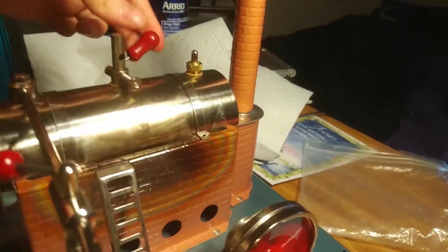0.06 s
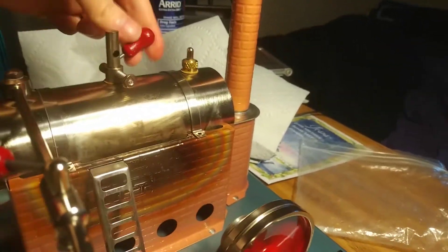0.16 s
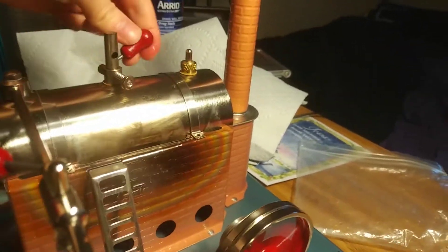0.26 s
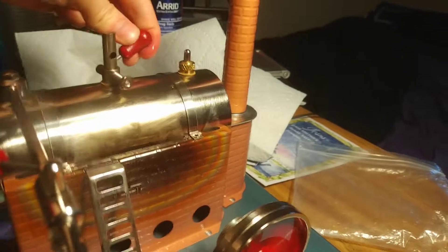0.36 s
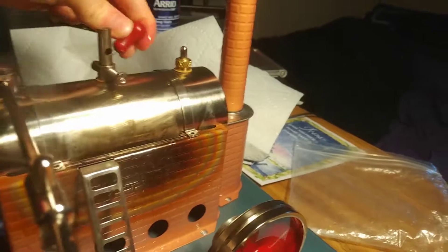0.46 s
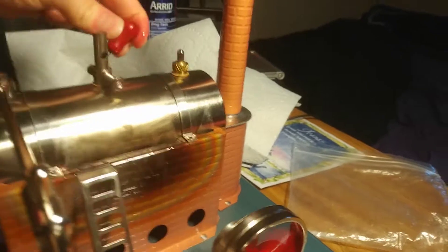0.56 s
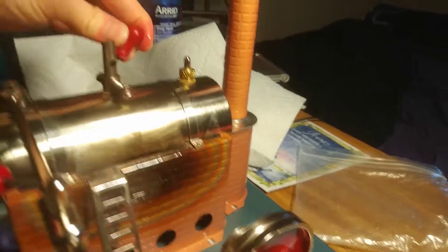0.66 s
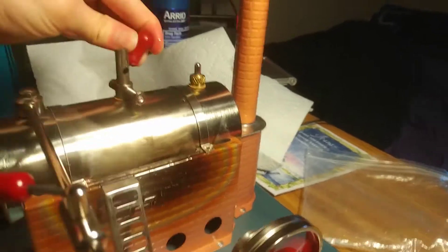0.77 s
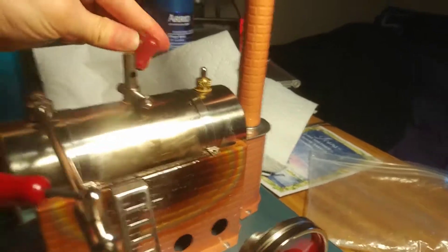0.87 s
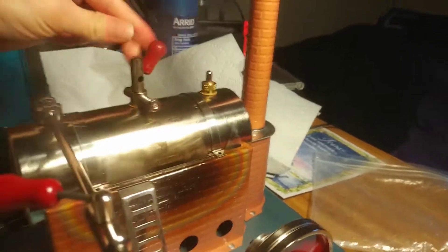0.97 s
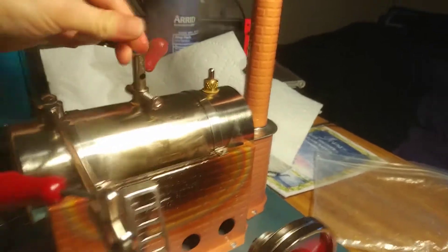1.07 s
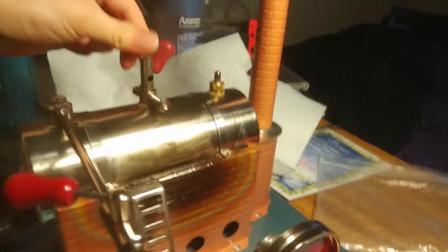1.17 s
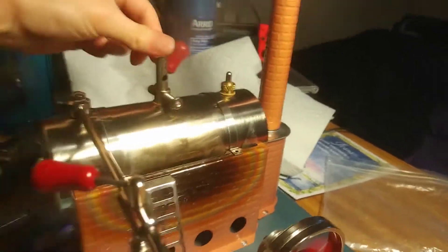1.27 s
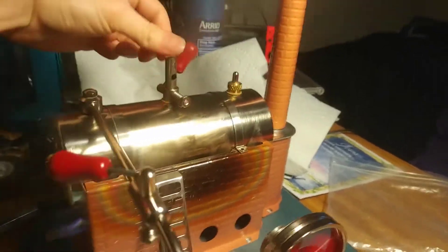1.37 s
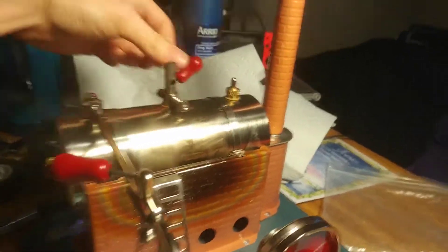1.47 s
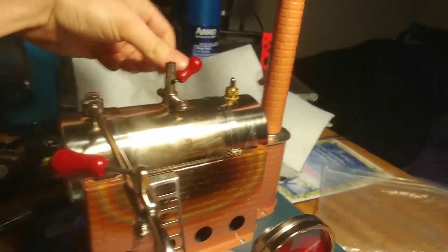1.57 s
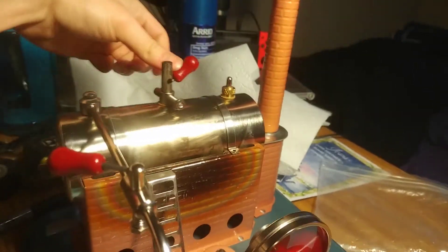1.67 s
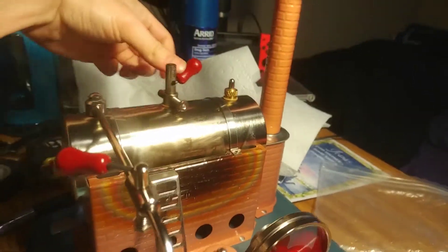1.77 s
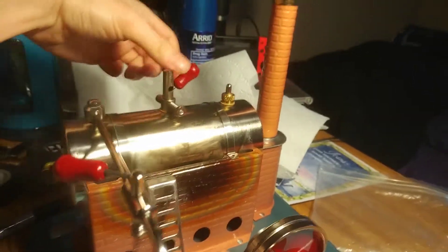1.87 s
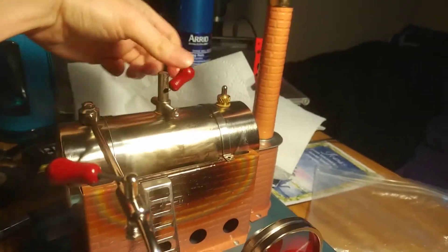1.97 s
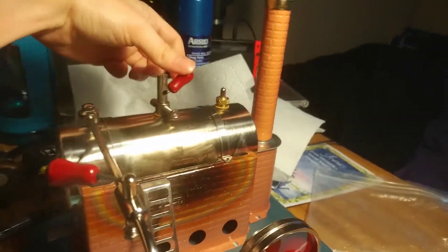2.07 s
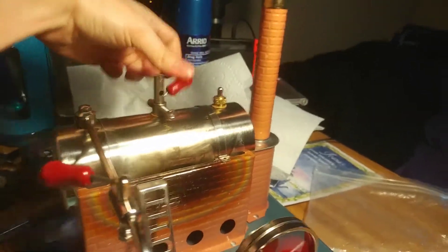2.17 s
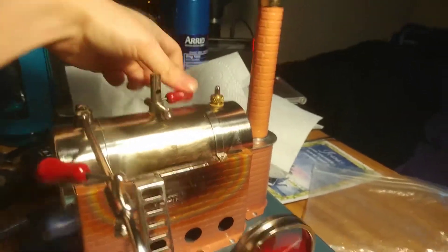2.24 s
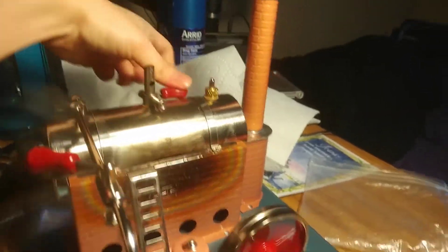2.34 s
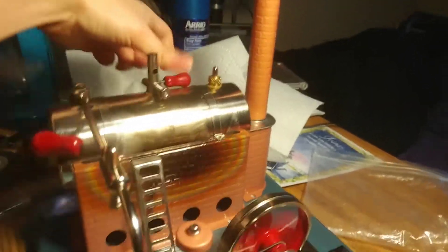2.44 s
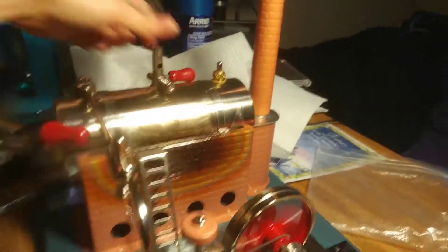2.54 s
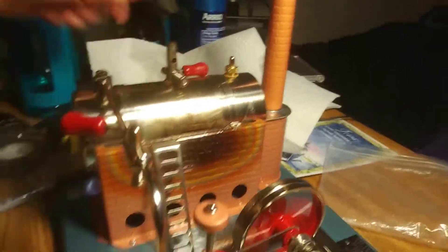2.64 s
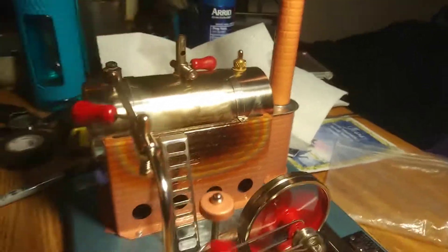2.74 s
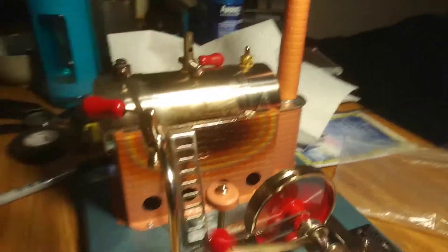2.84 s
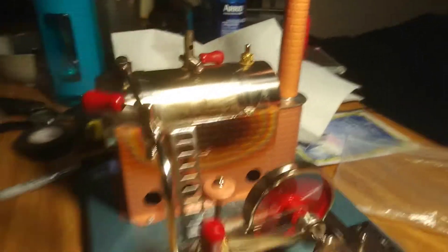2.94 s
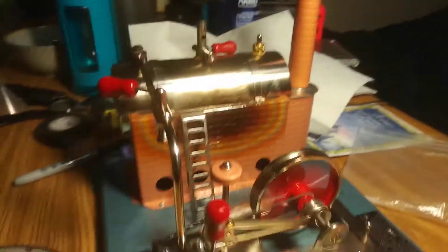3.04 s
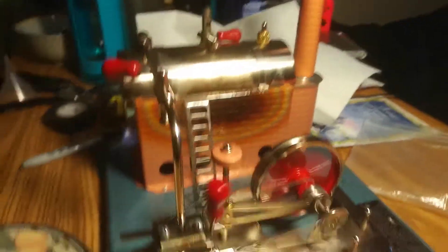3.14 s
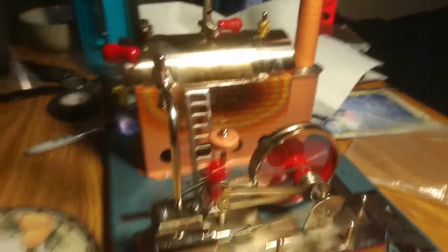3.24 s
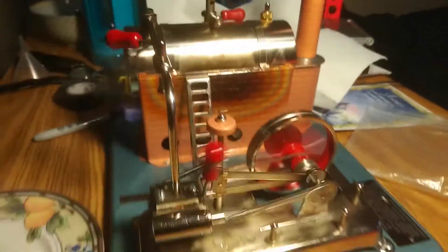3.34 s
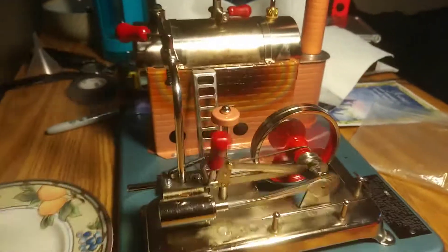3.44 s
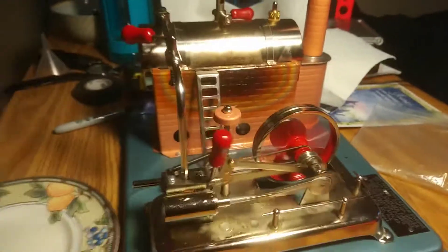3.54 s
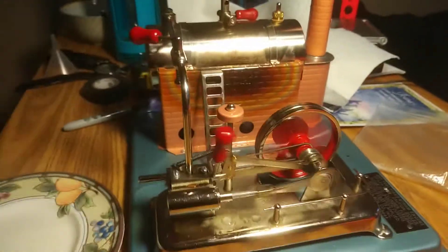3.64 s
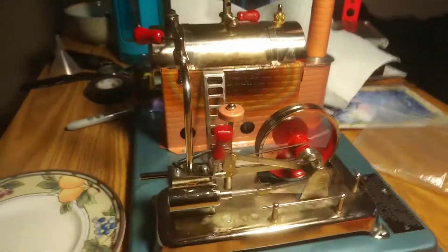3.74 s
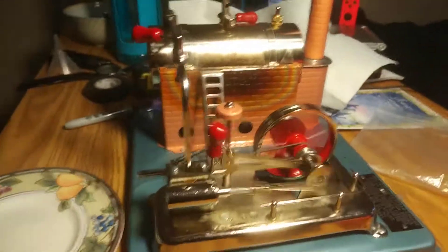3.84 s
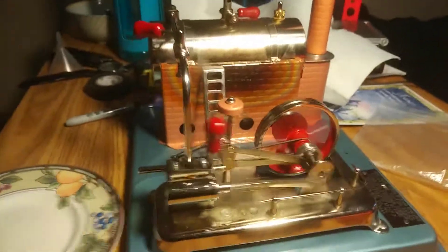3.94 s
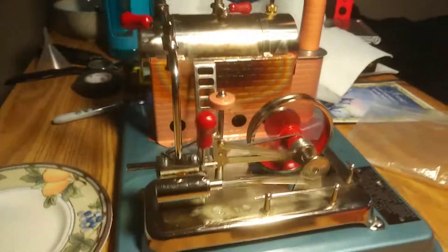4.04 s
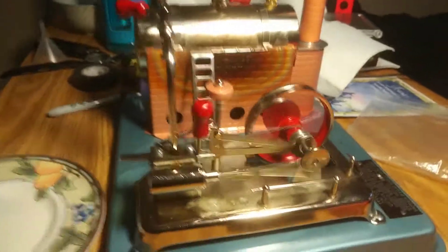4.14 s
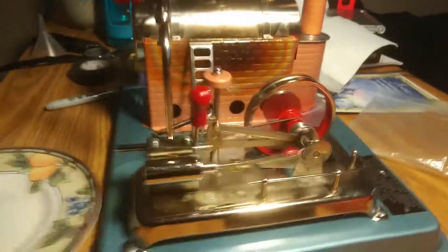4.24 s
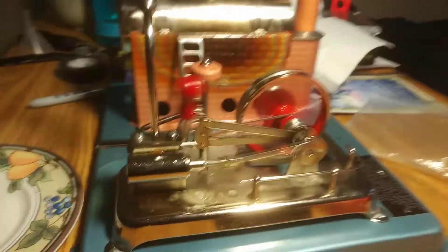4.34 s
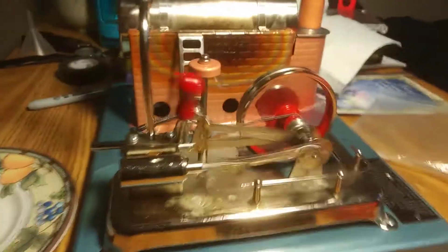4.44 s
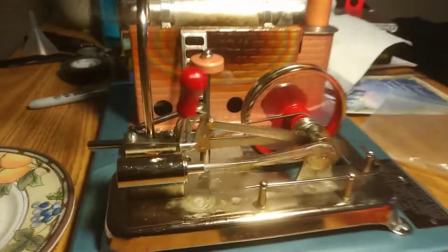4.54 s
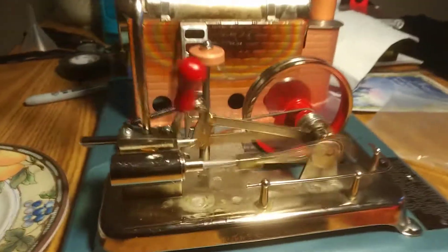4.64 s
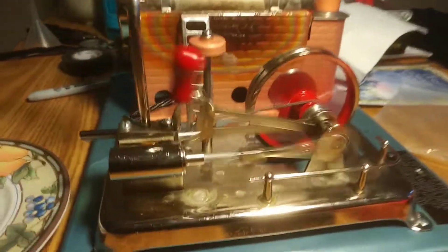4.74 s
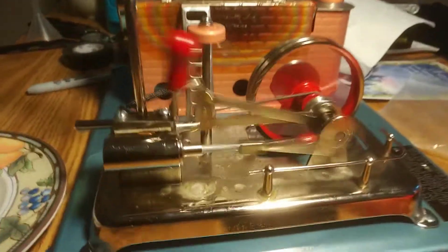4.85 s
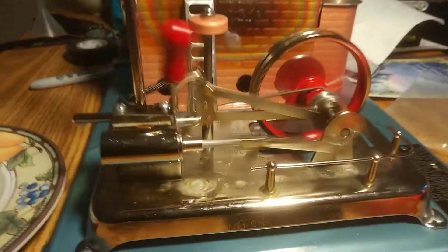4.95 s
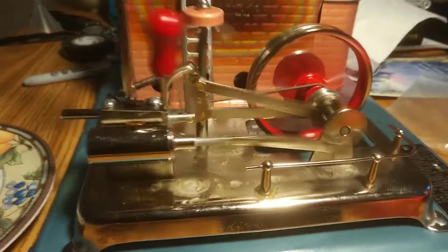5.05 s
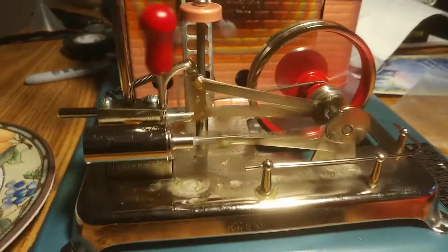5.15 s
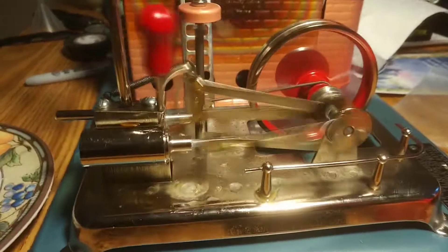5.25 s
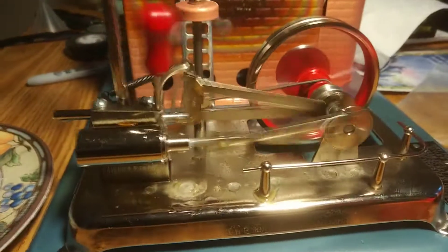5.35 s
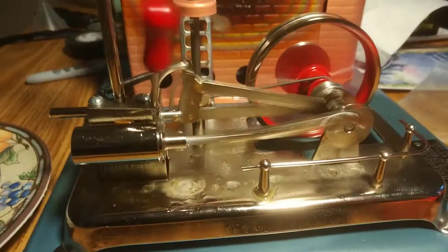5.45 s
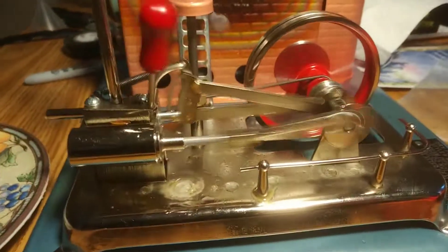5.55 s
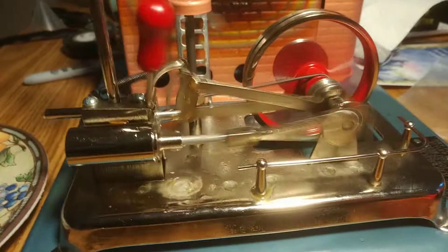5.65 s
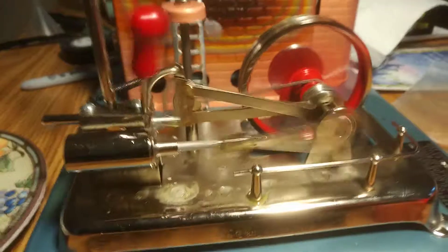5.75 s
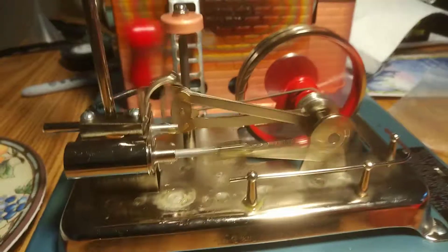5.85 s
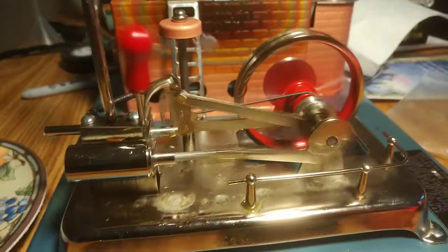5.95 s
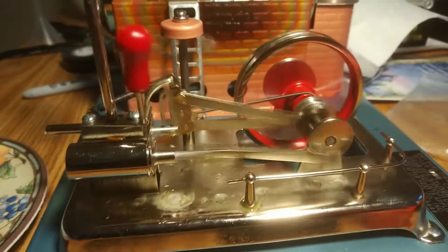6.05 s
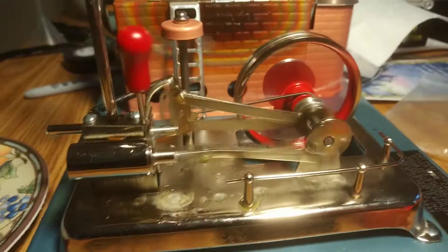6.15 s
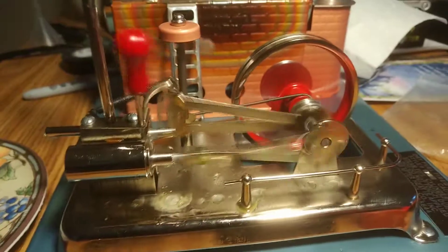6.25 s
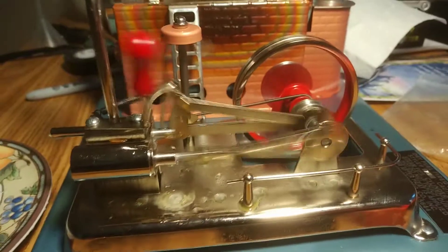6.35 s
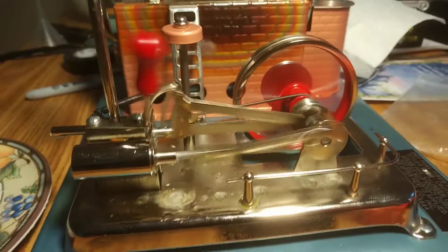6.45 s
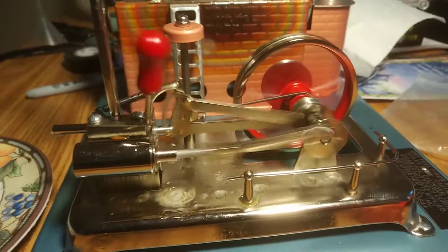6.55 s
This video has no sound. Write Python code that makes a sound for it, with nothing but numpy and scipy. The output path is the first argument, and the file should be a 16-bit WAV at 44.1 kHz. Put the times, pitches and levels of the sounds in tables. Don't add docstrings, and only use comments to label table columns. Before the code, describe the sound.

Rapid tinny clatter from a small steam engine, each turn a double knock with a breathy exhaust puff. A hiss swells and a piercing high whistle bursts out, fluttering and spitting with water drops, overloading the close microphone and pushing the engine down. It snaps off in under a second with a short room ring. A dull tap or two follows, and the engine chugs steadily over low table hum until it stops abruptly.

```python
import sys
import numpy as np
from scipy import signal
from scipy.fft import rfft, irfft, next_fast_len
from scipy.io import wavfile
from scipy.ndimage import uniform_filter1d

SR = 44100
rng = np.random.default_rng(int(sys.argv[2]) if len(sys.argv) > 2 else 0)


def amplitude_ratio(level_db):
    exponent = np.asarray(level_db, float) / 20
    return 10 ** exponent


def store_pcm(level_fs):
    pcm = np.round(np.clip(level_fs, -1, 1) * 32767).astype(np.int16)
    wavfile.write(sys.argv[1], SR, np.atleast_2d(pcm).T)


N = 291501
T = np.arange(N) / SR


def rms_one(x):
    return x / np.sqrt(np.mean(x ** 2) + 1e-20)


def in_time(rows):
    s, *columns = np.transpose(rows)
    return [np.interp(T, s, c) for c in columns]


def at_hz(points, hz):
    point_hz, db = np.array(points).T
    return np.interp(np.log(hz), np.log(point_hz), db)


def bumps(rows):
    return sum(height * np.exp(-((T - s) / length) ** 2) for s, height, length in rows)


def drift(rate_hz):
    r = np.exp(-2 * np.pi * rate_hz / SR)
    wander = signal.lfilter([1], [1, -2 * r, r * r], rng.standard_normal(N + 9000))
    return rms_one(wander[9000:])


def resonance(x, hz, width):
    r = np.exp(-np.pi * width / SR)
    zeros = np.array([1, 0, -1]) * (1 - r * r) / 2
    return signal.lfilter(zeros, [1, -2 * r * np.cos(2 * np.pi * hz / SR), r * r], x)


def clicks(times, db):
    out = np.zeros(N + SR) + 1e-18
    np.add.at(out, np.round(np.asarray(times) * SR).astype(int), amplitude_ratio(db))
    return out[:N]


def swell(x, rise_s, t60):
    up, down = np.exp(-1 / (rise_s * SR)), amplitude_ratio(-60 / (t60 * SR))
    fall = signal.lfilter([1], [1, -down], x)
    return signal.lfilter([1 - up], [1, -up], fall)


# t/s, turns done
CRANK = [(.030, 0), (.743, 8), (1.279, 14), (2.186, 24), (2.728, 30), (3.269, 36), (3.999, 44), (4.642, 51),
         (5.097, 56), (5.458, 60), (5.825, 64), (6.562, 72)]
# t/s, knock level/dB, bounce below knock/dB, puff level/dB
LOAD = [(0, -29.5, -9, -36), (.5, -28, -4, -33), (.6, -32.5, -4, -64), (.8, -26, -11.5, -19),
        (1.2, -26, 3, -18.5), (1.3, -32, -12, -34), (1.7, -36, -18, -36.5), (2.0, -31, -21, -36),
        (2.3, -33, -8, -38.5), (2.6, -28, -30, -35), (3.2, -28, -18, -39.5), (3.5, -29.5, -4, -39.5),
        (4.7, -29.5, -4, -39.5), (5.251, -25.5, -2.5, -38), (6.6, -28.5, -11, -38)]
RETURN_KNOCK_DB, RETURN_PUFF_DB = -5.0, -6.0
KNOCK_SPREAD_DB, BOUNCE_SPREAD_DB, RETURN_SPREAD_DB, PUFF_SPREAD_DB = 1.0, 2.5, 1.5, 1.2


def turns():
    at, done = np.transpose(CRANK)
    s = np.interp(np.arange(done[-1] + 1), done, at)
    when, *load = np.transpose(LOAD)
    knock, slack, puff = [np.interp(s, when, c) for c in load]
    luck = rng.standard_normal((5, len(s)))
    return np.array([
        s,
        knock + KNOCK_SPREAD_DB * luck[0],
        knock + slack + BOUNCE_SPREAD_DB * luck[1],
        knock + RETURN_KNOCK_DB + RETURN_SPREAD_DB * luck[2],
        puff + PUFF_SPREAD_DB * luck[3],
        puff + RETURN_PUFF_DB + 2 * PUFF_SPREAD_DB * luck[4]])


# t after the knock/s, level/dB
VALVE_GEAR = [
    (.029, -48),
    (.048, -39),
    (.080, -42),
]
# f/Hz, swell/s, level/dB
BASE = [(626.6, 0.0024, -2.5), (975, 0.00079, -10), (254, 0.0026, -12.5), (2300, 0.001, -30.5),
        (762.4, 0.0012, -7), (5840, 0.00062, -36)]
BOUNCE_S, RETURN_S, RETURN_BOUNCE_S = .0135, .059, .070
HAND_OFF_S, HAND_STIFFENS = 1.6, 1.057


def knocks(turn):
    s, knock, bounce, back = turn[:4]
    luck = rng.standard_normal((len(s), 8))
    hits = clicks(s, knock)
    hits -= clicks(s + BOUNCE_S + 0.00115 * luck[:, 0], bounce)
    hits += clicks(s + RETURN_S + 0.000954 * luck[:, 1], back - 1.5 + 2.6 * luck[:, 2])
    hits -= clicks(s + RETURN_BOUNCE_S + 0.001246 * luck[:, 3], back - 1 + 1.5 * luck[:, 4])
    for k, (later, db) in enumerate(VALVE_GEAR):
        hits += clicks(s + later, db + 1.0 * luck[:, 5 + k])
    t = T[:2000]
    out = 0
    for part, lift in [(T < HAND_OFF_S, HAND_STIFFENS), (T >= HAND_OFF_S, 1)]:
        ring = 0
        for hz, rise, db in BASE:
            cushioned = (t / rise) ** 2 * np.exp(1 - t / rise)
            ring = ring + amplitude_ratio(db) * cushioned * np.sin(2 * np.pi * hz * lift * t)
        out = out + signal.fftconvolve(hits * part, ring)
    return out[round(.006 * SR):][:N]


# t after the knock/s, level against knock/dB, f/Hz
TICKS = [
    (-.005, -33, 5500),
    (.043, -33, 5500),
    (.023, -28, 1600),
    (.059, -26, 1600),
    (.025, -23, 1020),
    (.060, -19, 1020),
    (.021, -28, 2500),
]


def ticks(turn):
    out = 0
    for later, db, hz in TICKS:
        hits = clicks(turn[0] + later, turn[1] + db + 0.94 * rng.standard_normal(turn.shape[1]))
        out = out + resonance(resonance(hits, hz, 440), hz, 440) * SR / 420
    return out * amplitude_ratio([[-3], [3]])


# f/Hz, likeness (0 to 1)
LIKENESS = [(60, 0.95), (130, 0.93), (290, 0.86), (640, 0.87), (1410, 0.13), (3100, 0.06), (6820, 0.57),
            (15000, 0.74)]
# f/Hz, left minus right level/dB
BALANCE_DB = [(60, 7), (110, -1), (200, 2), (380, 2), (700, 6.5), (1290, -3.5), (2380, -7), (4400, -11.5),
              (8120, -5.5), (15000, 4.5)]
# f/Hz, left leads/rad
PORT_PHASE = [(0, 0), (340, -0.4), (780, 0.1), (1030, -0.6), (1550, -4.3), (1980, -3.6), (2240, -2.0),
              (2930, 1.0), (3960, -0.7), (4390, 1.9), (5430, 4.8), (6290, 6.4), (6890, 6.3), (16200, 6.3)]


def stereo_noise(spectrum):
    size = next_fast_len(N)
    hz = np.maximum(np.fft.rfftfreq(size, 1 / SR), 1)
    mid, side = rfft(rng.standard_normal((2, size)))
    alike = np.clip(at_hz(LIKENESS, hz), 0, 1)
    pair = np.sqrt(1 + alike) * mid + np.sqrt(1 - alike) * side * [[1], [-1]]
    pair[0] *= np.exp(1j * np.interp(hz, *np.transpose(PORT_PHASE)))
    colour_db = at_hz(spectrum, hz) + at_hz(BALANCE_DB, hz) * [[.5], [-.5]]
    return rms_one(irfft(pair * amplitude_ratio(colour_db), size)[:, :N])


# f/Hz, level per Hz/dB
PUFF_COLOUR = [(2350, -42), (4000, -17), (4930, -10), (5540, -17.5), (6040, -20), (7270, -6), (9890, -2),
               (12900, 3.5), (16000, -8)]
# t/s, level/dB, t60/s
SPURTS = [
    (.0, -35, 0.049),
    (.028, -30, 0.033),
    (0.037, -20, 0.14),
    (0.109, -24.5, 0.069),
    (.172, -28, 0.034),
    (0.401, -33, 0.023),
]
PUFF_S, RETURN_PUFF_S = .0115, 0.054


def exhaust(turn):
    s, puff, back = turn[[0, 4, 5]]
    puffs = clicks(s + PUFF_S, puff + 4) + clicks(s + RETURN_PUFF_S, back + 6.5)
    burst = swell(puffs, .0028, .032)
    trail = swell(clicks(s + PUFF_S, puff - 4), .003, .32)
    spurts = sum(swell(clicks([at], db), 0.00143, t60) for at, db, t60 in SPURTS)
    return (burst + trail + spurts) * amplitude_ratio(1.36 * drift(150)) * stereo_noise(PUFF_COLOUR)


# t/s, f/Hz, level/dB
BLAST = [
    (.63, 4520, -34),
    (.652, 4650, -30),
    (.664, 5050, -9),
    (.685, 5090, -4),
    (.706, 5350, -3),
    (.765, 5170, 1.5),
    (.815, 5720, 2.5),
    (.885, 5760, 3),
    (.945, 5560, 2.5),
]
# t/s, left minus right level/dB
SHADE = [
    (.645, 1),
    (.665, -25),
    (.705, -6.5),
    (.88, -6),
    (.905, -3.9),
    (1.25, 0),
    (1.31, -11.5),
    (1.37, -14),
    (1.41, -6.5),
]
# t/s, depth/dB, length/s
SLIPS = [
    (.8, 7.5, 0.017),
    (1.0, -0.5, 0.014),
    (1.105, 0.5, 0.027),
    (1.255, 3.5, 0.037),
]
SWELL_DB_PER_S = -5
RECOVER_HZ, RECOVER_S, SAG_HZ, SAG_S = 210, .055, 310, .18
CLOSE_S, CLOSING_S, CLOSING_POWER = 1.448, .038, 3.3
CLOSING_DROP_HZ, CLOSING_DROP_DB = 1400, 27


def lever():
    hz, db = in_time(BLAST)
    held = np.maximum(T - BLAST[-1][0], 0)
    shut = np.clip((T - CLOSE_S) / CLOSING_S, 0, 1) ** CLOSING_POWER
    db = db + SWELL_DB_PER_S * held - bumps(SLIPS) - CLOSING_DROP_DB * shut
    hz = hz + RECOVER_HZ * (1 - np.exp(-held / RECOVER_S))
    hz = hz - SAG_HZ * (1 - np.exp(-held / SAG_S)) - CLOSING_DROP_HZ * shut
    return hz, db + in_time(SHADE)[0], db


# t/s, depth/dB, length/ms
DROPS = [(0.667, 5, 2.4), (0.688, 8, 2.3), (0.799, 8, 2.3), (0.911, 8, 3.0), (0.93, 12, 1.4),
         (0.938, 13, 2.2), (0.972, 11, 11.9), (0.981, 9, 2.4), (0.989, 8, 3.3), (1.015, 5, 3.7),
         (1.089, 7, 4.9), (1.108, 11, 3.8), (1.122, 15, 3.9), (1.14, 11, 2.9), (1.212, 10, 4.8),
         (1.22, 5, 2.8), (1.289, 4, 2.0), (1.303, 4, 1.6)]
# t/s, left leads/rad
LEAD = [
    (.8, 1.3),
    (.82, .6),
    (.905, .6),
    (.945, 2.6),
    (1, 0),
    (1.2, -.4),
    (1.255, -1.3),
    (1.295, -4.8),
    (1.41, -6.8),
]
# t/s, flow as hiss level/dB, wetness as pipe noise level/dB
JET = [
    (.53, -50.5, -73),
    (.56, -34, -80),
    (.63, -28, -29.5),
    (.7, -20, -25.5),
    (.85, -22.5, -44),
    (.98, -18, -18.5),
    (1.47, -23.5, -30),
    (1.5, -39, -21.5),
    (1.56, -52, -76),
]
# f/Hz, level per Hz/dB
JET_COLOUR = [(1500, -15.5), (3000, -7), (4400, -9.5), (6500, 5), (8000, -0.5), (11000, 0), (14000, 4),
              (16000, -2)]
# t/s, f/Hz, level/dB
BREATHY_START = [
    (.54, 5650, -38),
    (.585, 5900, -31),
    (.61, 5980, -24),
    (.625, 6300, -45),
]
LEAK_DB, LEAK_GROWS_DB_PER_S, LEAK_SEALED_S = -54, 5, 2.16


def whistle():
    hz, left_db, right_db = lever()
    choke = sum(1.25 * db * np.exp(-((T - s) / (ms * .0006)) ** 2) for s, db, ms in DROPS)
    sounding = (T > BLAST[0][0]) & (T < CLOSE_S + CLOSING_S)
    shaken_hz = hz + 13.3 * drift(54.5) + 4.86 * choke * drift(398)
    phase = 2 * np.pi * np.cumsum(shaken_hz) / SR
    flutter = 0.36 * drift(420)
    right = amplitude_ratio(right_db - choke + flutter) * np.sin(phase)
    left_level = amplitude_ratio(left_db - 0.174 * choke + flutter + 1.1 * drift(60))
    left = left_level * np.sin(phase + in_time(LEAD)[0])
    octave = amplitude_ratio(right_db - 35 + 2.5 * drift(20)) * np.sin(2 * phase)
    tone = np.sqrt(2) * sounding * np.array([left + octave, right + octave])

    hiss_db, pipe_db = in_time(JET)
    jet = stereo_noise(JET_COLOUR)
    jet = jet + amplitude_ratio(14.5) * resonance(jet, 9010, 10.7) * (T > 1) * (T < 1.32)
    hiss = amplitude_ratio(hiss_db + .3 * choke + 1.5 * drift(40)) * jet

    pipe_phase = 2 * np.pi * np.cumsum(np.where(T < CLOSE_S, hz, 5600)) / SR
    leak_db = LEAK_DB - LEAK_GROWS_DB_PER_S * (LEAK_SEALED_S - T)
    leak = amplitude_ratio(leak_db - 250 * np.maximum(T - LEAK_SEALED_S, 0)) * (T > CLOSE_S)
    turbulence = drift(492) * np.sin(pipe_phase) + drift(524) * np.cos(pipe_phase)
    skirt = (amplitude_ratio(pipe_db + 0.18 * choke) * (T < JET[-1][0]) + leak) * turbulence

    start_hz, start_db = in_time(BREATHY_START)
    start = amplitude_ratio(start_db) * drift(260) * np.sin(2 * np.pi * np.cumsum(start_hz) / SR)
    start *= (T > BREATHY_START[0][0]) & (T < BREATHY_START[-1][0])
    echo = room(tone[1]) * amplitude_ratio([[-21], [-12]])
    return tone + hiss + (skirt + start) * amplitude_ratio([[-6], [4]]) + echo


# t/s, level/dB, f/Hz
TAPS = [(0.028, -32, 1690), (2.047, -23.5, 1000), (2.049, -42, 2640), (2.271, -37, 2300),
        (2.298, -34.5, 2600), (2.305, -41, 3100), (2.318, -41, 3130), (2.426, -42, 2230),
        (2.566, -38, 2330), (3.509, -33.5, 1430), (3.563, -41.5, 1490), (5.883, -39, 1440),
        (6.031, -39, 1870)]


def taps():
    out = 0
    for s, db, hz in TAPS:
        body = resonance(clicks([s, s + 0.00258], [db + 29, db + 32.5]), hz, 0.25 * hz)
        body = resonance(body, hz, .5 * hz)
        thud = resonance(resonance(clicks([s], db + 39), 610, 360), 610, 360)
        out = out + body + thud
    return out * amplitude_ratio([[-4], [3]])


def drone(hz, width):
    return rms_one(resonance(resonance(rng.standard_normal(N), hz, width), hz, width))


# f/Hz, level per Hz/dB
FLOOR = [(18, -38), (30, -14.5), (134, -2.5), (311, -10), (486, -8), (632, -4), (844, -16.5), (1010, -10.5),
         (1390, -19), (2290, -21), (4780, -36.5), (5450, -28.5), (6050, -35), (13300, -36), (16000, -33)]
# t/s, level/dB
FLOOR_DB = [(0.0, -34.5), (0.53, -39), (0.92, -33), (1.88, -38), (6.61, -37)]
# f/Hz, width/Hz, level/dB
DRONES = [(120.5, 14.5, -54.5), (358.7, 12.9, -52), (62.8, 9.23, -52), (640.5, 4.7, -56)]
# t/s, rise/dB, length/s
BOOMS = [
    (.26, 3.5, 0.069),
    (1.4, 6, .2),
    (2.3, 10.5, .18),
    (3.9, 6, 0.52),
    (5.6, 9, 0.6),
    (6.42, 8.5, 0.082),
]
BOOM_DB = -52.5
# t/s, level/dB
NOTE = [
    (0, -47),
    (.26, -57),
    (.68, -46),
    (1.3, -43),
    (1.58, -34),
    (1.7, -42),
    (2.7, -43),
    (4.1, -52),
    (5.8, -47),
]


def floor():
    boom_db, note_db = BOOM_DB + bumps(BOOMS), in_time(NOTE)[0]
    drones = sum(amplitude_ratio(db) * drone(hz, width) for hz, width, db in DRONES)
    boom = amplitude_ratio(boom_db + 1.0) * drone(142.2, 11.8)
    note = amplitude_ratio(note_db - 3.0) * np.array([drone(1023, 100.0), drone(1030, 80.6)])
    roar = amplitude_ratio(in_time(FLOOR_DB)[0] + 1.42 * drift(24)) * stereo_noise(FLOOR)
    return roar + drones + boom + note


ROOM_T60_S = 0.38


def room(x):
    size = next_fast_len(N + SR)
    w = 2 * np.pi * np.fft.rfftfreq(size)
    lags = (rng.uniform(0.011, .034, (2, 8)) * SR).astype(int)
    spectrum = rfft(x, size)
    sides = []
    for side in lags:
        loops = [amplitude_ratio(-60 * lag / SR / ROOM_T60_S) * np.exp(-1j * w * lag) for lag in side]
        sides.append(irfft(spectrum * sum(g / (1 - g) for g in loops), size)[:N])
    return np.array(sides) / 4


def scene():
    turn = turns()
    knock = knocks(turn)
    echo = amplitude_ratio(-21) * room(knock)
    engine = knock * amplitude_ratio([[1.2], [-1.2]]) + echo + ticks(turn) + exhaust(turn)
    return engine + whistle() + taps() + floor()


LOW_CUT_HZ, TOP_CUT_HZ = 48, 15800
KEPT_SHARE = .9


def thin_treble(x):
    hz, s, cells = signal.stft(x, SR, nperseg=1024)
    power = np.abs(cells) ** 2
    band = (hz // 430).astype(int)
    starts = np.flatnonzero(np.diff(band, prepend=-1))
    level = 10 * np.log10(np.add.reduceat(power, starts, axis=1) + 1e-14)
    luck = rng.standard_normal(level.shape) + 1.6 * rng.standard_normal(level.shape[1:])
    luck = rms_one(uniform_filter1d(luck, size=7, axis=2))
    below = level.max(axis=1, keepdims=True) - level
    masked = np.clip((level.max(axis=(0, 1)) - level - 28) / 20, 0, 1)
    treble = (np.arange(level.shape[1]) > 15)[:, None]
    dropped = luck < -2.2 + 1.5 * masked + .9 * treble
    gain = np.where(dropped, .02, amplitude_ratio((1.2 + 2.2 * treble) * luck))
    gain = np.where(below < 8, 1, gain)[:, band]
    weak = power < KEPT_SHARE * amplitude_ratio(2 * level - 20)[:, band]
    gain *= np.where(weak & (hz > 6000)[:, None], .1, 1.15)
    gain[:, hz < 3000] = 1
    gain[:, hz > TOP_CUT_HZ] = 0
    return signal.istft(cells * gain, SR, nperseg=1024)[1][:, :N]


def low_pass(x):
    return signal.sosfilt(signal.butter(12, 16640, fs=SR, output="sos"), x)


def record(dry):
    dry = signal.sosfilt(signal.butter(4, LOW_CUT_HZ, "high", fs=SR, output="sos"), dry)
    over = np.maximum(20 * np.log10(np.abs(dry).max(0) + 1e-9) + 2.0, 0)
    release = 140.0 * T
    held = np.maximum.accumulate(over + release) - release
    gain = amplitude_ratio(-uniform_filter1d(held, size=90))
    mix = thin_treble(np.clip(dry * gain, -1, 1))
    return low_pass(mix)


dry = scene()
out = record(dry)
store_pcm(out)
```